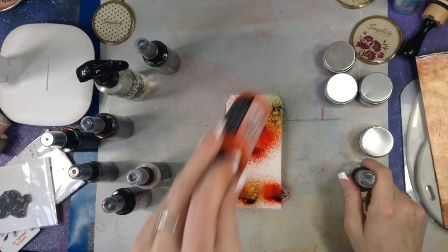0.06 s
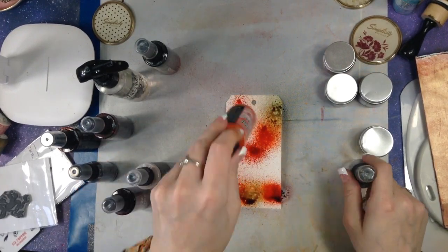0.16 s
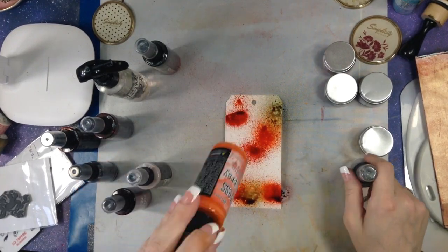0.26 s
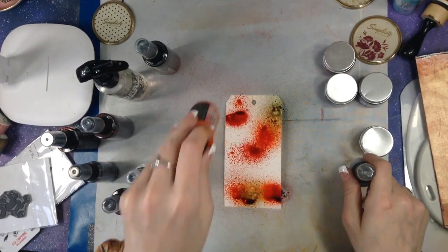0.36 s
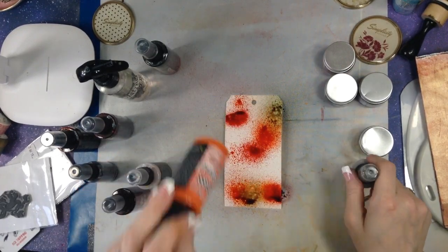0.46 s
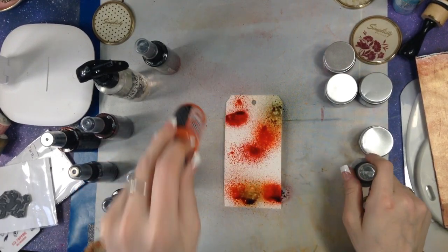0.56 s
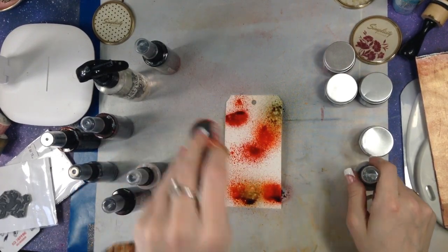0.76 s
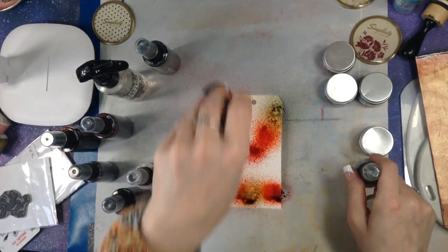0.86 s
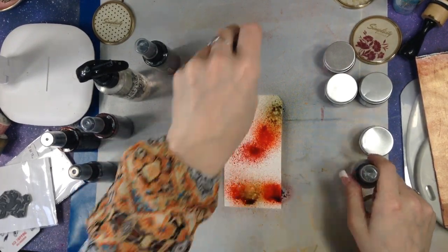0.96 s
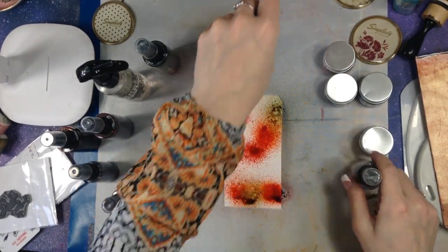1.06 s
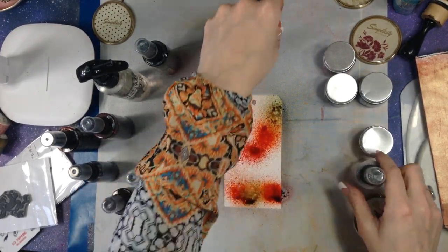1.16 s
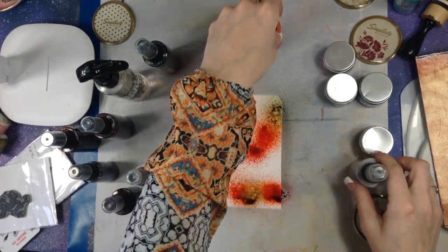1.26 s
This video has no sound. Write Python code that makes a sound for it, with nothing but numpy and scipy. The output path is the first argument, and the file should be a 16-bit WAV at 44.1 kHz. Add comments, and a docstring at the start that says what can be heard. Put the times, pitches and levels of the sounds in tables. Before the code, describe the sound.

A small plastic spray bottle is shaken briskly close to the microphone, its ball clacking end to end about eleven times with light ticks and wet sloshing, then weakening into faint ticks in a small quiet room.

```python
"""Shaken spray bottle

A small spray bottle is shaken by hand over a craft desk in a small room. Its mixing ball clacks against the two
ends in turn (noise cracks, struck modes) and ticks along the wall; the ink sloshes, gulps and retunes the air
pocket (resonant bubbles and droplets). Three soft low thumps, the last two close together, ring the desk late in
the shaking; then the rattle dies away over a faint rumble and a steady noise floor."""
import sys
import numpy as np
from scipy import signal
from scipy.fft import rfft, irfft, next_fast_len
from scipy.io import wavfile
from scipy.ndimage import uniform_filter1d

SR = 44100
rng = np.random.default_rng(int(sys.argv[2]) if len(sys.argv) > 2 else 0)


def pcm_store(signal):
    """Save signal as 16-bit PCM."""
    levels = np.round(np.clip(np.atleast_2d(signal), -1, 1) * 32767)
    wavfile.write(sys.argv[1], SR, levels.astype(np.int16).T)


N = 57330
T = np.arange(N) / SR
HIT_T = T[:SR // 5]  # time axis of one contact [s]

# Spectral weighting of ball contacts: (frequency [Hz], gain [dB])
CONTACT_SPECTRUM = [(30, -50), (200, -26), (450, -15), (800, -8), (1300, -5), (2400, 0), (3500, 1),
                    (5500, 1), (8500, -.5), (11000, -0.5), (14500, -4), (16000, -11.5)]
CRACK_T60_S, CRACK_RISE_S = 0.0025, 0.00012
BEAM_SHARE = 0.82  # share of the wall boost and cut [dB] that also reaches the room


def from_db(db):
    """Decibels to gain."""
    return 10 ** (np.asarray(db) / 20)


def unit(x):
    """Scale to an energy of 1."""
    return x / np.sqrt(np.sum(x ** 2) + 1e-20)


def at_hz(points, hz):
    """Interpolate a table on a log-frequency axis."""
    f, v = np.transpose(points)
    return np.interp(np.log(np.maximum(hz, 1)), np.log(f), v)


def level_curve(points):
    """Gain over time from (time [s], level [dB])."""
    return from_db(np.interp(T, *np.transpose(points)))


def fade(t, t60):
    """Exponential decay, -60 dB at t60."""
    return np.exp(-np.log(1000) * t / t60)


def add(out, s, x):
    """Mix x in at time s."""
    i = max(int(s * SR), 0)
    out[i:i + len(x)] += x[:max(N - i, 0)]


def colour(x, spectrum):
    """Causal minimum-phase filter with the given spectrum, by folding its cepstrum."""
    size = 2 * next_fast_len(len(x))
    gain = from_db(at_hz(spectrum, np.fft.rfftfreq(size, 1 / SR)))
    cepstrum = irfft(np.log(gain))
    cepstrum[1:size // 2] *= 2
    cepstrum[size // 2 + 1:] = 0
    return irfft(rfft(x, size) * np.exp(rfft(cepstrum)))[:len(x)]


def boost(x, hz, q, db):
    """Lift or damp one frequency range."""
    b, a = signal.iirpeak(min(hz, SR / 2 - 1000), q, fs=SR)
    return x + (from_db(db) - 1) * signal.lfilter(b, a, x)


def resonate(x, hz, q):
    """Keep only a steep-sided resonance: two peak filters in series."""
    b, a = signal.iirpeak(hz, q, fs=SR)
    return signal.lfilter(b, a, signal.lfilter(b, a, x))


def no_bass(x):
    """High-pass: a small cavity radiates little bass."""
    return signal.sosfilt(signal.butter(2, 600, "high", fs=SR, output="sos"), x)


def clacks():
    """Each end stop cracks, rebounds, rings shell, body and air pocket, and gives a dull push."""
    # Ball hits on the ends: (time [s], level before gain [dB], shell noise rise [s], crack [dB],
    # rebound delay [s], rebound [dB], air pocket [Hz], [dB], hollow body [Hz], [dB],
    # wall resonance [Hz], boost [dB], damped range [Hz], cut [dB], dull push [dB])
    end_hits = [ (0.2118, -21, 0.00016, 0, 0.0026, -1.5, 858, -7, 1600, -15, 4330, 9.5, 1860, -0.5, -45),
                (0.2677, -22, 0.0002, -1, .0010, -1.5, 1041, -8, 1835, -6.5, 6000, 6.5, 3500, -6.5, -54),
                (0.3930, -22.5, 0.00052, 6, 0.00052, 5, 800, -21.5, 2250, -13, 3390, 5.5, 1450, -14, -38),
                (0.4572, -23, 0.00028, 1.5, 0.000817, 0.5, 1710, -3, 1507, -11, 8300, 9.5, 920, -0.5, -41),
                (0.5752, -21.5, 0.00018, 1, 0.0019, 2.5, 870, -23.5, 2210, -13, 3200, 7.5, 5600, -3, -38),
                (0.6394, -24.5, 0.0009, -3, 0.0021, -0.5, 748, -11.5, 1474, -5, 1960, 12, 3700, -4, -53),
                (0.7521, -22.5, 0.00047, 3.5, 0.00029, -9, 905, -16, 2120, -14, 5780, 11, 1700, -5, -26.5),
                (0.8298, -20.5, 0.00042, -2.5, .0023, -1.5, 1015, -8, 2000, -12, 5170, 1.5, 3800, -4, -47),
                (0.9420, -29.5, 0.00087, 2, 0.0012, -4, 880, -32, 4050, -4.5, 7430, 14.5, 5700, -4, -44),
                (1.019, -32.5, 0.0054, -7.5, .0030, -7.5, 1050, -9, 1540, -7, 3000, 3.5, 5100, -3, -27),
                (1.0830, -46, 0.0014, -9, .0020, -5, 1390, -4, 1850, -2, 4140, 11, 6000, -5, -38)]
    gain_db = 22
    wall_q, damped_q = 5.5, 1.54
    pocket_t60_s, body_t60_s = 0.041, 0.034
    push_t60_s, push_top_hz = 0.0013, 515

    walls = np.zeros((2, N))  # direct, into the room
    hollow = np.zeros(N)  # same in all directions
    push_band = signal.butter(2, [35, push_top_hz], "band", fs=SR, output="sos")
    push = unit(signal.sosfilt(push_band, fade(HIT_T, push_t60_s)))
    for (s, db, rise, crack_db, after, rebound_db, pocket_hz, pocket_db, body_hz, body_db,
         wall_hz, wall_db, damped_hz, damped_db, push_db) in end_hits:
        gain = from_db(db + gain_db)
        first = from_db(crack_db) * burst(CRACK_RISE_S, CRACK_T60_S) + shell(rise)
        rebound = from_db(rebound_db) * burst(CRACK_RISE_S, CRACK_T60_S)
        for when, contact in ((s, first), (s + after, rebound)):
            for wall, share in zip(walls, (1, BEAM_SHARE)):
                lifted = boost(contact, wall_hz, wall_q, share * wall_db)
                add(wall, when, gain * boost(lifted, damped_hz, damped_q, share * damped_db))
        pocket = from_db(pocket_db) * cavity(pocket_hz, pocket_t60_s)
        body = from_db(body_db) * cavity(body_hz, body_t60_s)
        add(hollow, s, gain * (pocket - body + from_db(push_db) * push))
    return [colour(wall, CONTACT_SPECTRUM) + hollow for wall in walls]


def ticks():
    """Light contacts along the wall: a crack plus a softly rising shell ring, boosted at one resonance."""
    # Ball grazes: (time [s], level before gain [dB], resonance [Hz])
    grazes = [(0.006, -55.5, 4000), (0.024, -59, 5100), (0.1620, -52, 6700), (0.17, -46.5, 1190),
              (0.1864, -37.5, 2880), (0.2, -52, 6500), (0.3128, -34.5, 1780), (0.3197, -34, 10400),
              (0.365, -31, 2150), (0.3825, -53, 3500), (0.487, -29.5, 7900), (0.4953, -28, 6500),
              (0.5215, -47, 7000), (0.5304, -30.5, 1880), (0.556, -39.5, 750), (0.637, -28, 5060),
              (0.6488, -21.5, 1620), (0.7175, -31, 4160), (0.7290, -32.5, 2830), (0.8893, -33, 1970),
              (0.9172, -42, 1900), (0.9449, -26.5, 4050), (1.009, -35, 6940), (1.032, -33.5, 6000),
              (1.0500, -37.5, 2300), (1.0980, -36.5, 1530), (1.13, -45, 1480), (1.164, -52.5, 6000),
              (1.194, -50, 6900), (1.221, -55, 1760), (1.2770, -74, 12000), (1.2840, -59, 1600)]
    gain_db, rise_s, ring_db = 17.5, 0.0024, -2.5
    resonance_q, boost_db = 4.5, 6.5

    out = np.zeros(N)
    for s, db, hz in grazes:
        touch = burst(CRACK_RISE_S, CRACK_T60_S) + from_db(ring_db) * shell(rise_s)
        add(out, s, from_db(db + gain_db) * boost(touch, hz, resonance_q, boost_db))
    return colour(out, CONTACT_SPECTRUM)


def shell(rise):
    """Plastic shell: discrete modes, redrawn in strength and sign, plus a dense short-lived vibration."""
    # Shell modes: (frequency [Hz], mean level [dB], T60 [s])
    shell_modes = [(1405, -17, 0.14), (1873, -21, .1), (3394, -18, 0.048), (3540, -20, 0.1),
                   (4000, -17.5, 0.038), (4560, -42, 0.064), (4890, -22, 0.03), (4980, -18.5, 0.074),
                   (5876, -28, 0.039), (6350, -13.5, 0.037), (6880, -15.5, 0.015), (8050, -16.5, .04),
                   (9900, -17, .03)]
    spread_db, dense_t60_s, dense_db = 2.4, 0.063, 2.5

    modes = 0
    for hz, db, t60 in shell_modes:
        strength = from_db(db + rng.normal(0, spread_db)) * rng.choice([-1, 1])
        modes = modes + strength * tone(hz, t60)
    return modes + from_db(dense_db) * burst(rise, dense_t60_s)


def burst(rise, t60):
    """Countless modes struck about equally: decaying noise with an evened spectrum, energy 1."""
    even_over_bins = 90
    noise = np.tanh(2 * rng.standard_normal(len(HIT_T)))
    x = noise * (1 - np.exp(-HIT_T / rise)) * fade(HIT_T, t60)
    power = np.abs(rfft(unit(x))) ** 2
    height = np.sqrt(uniform_filter1d(power, size=even_over_bins) + 1e-2)
    hz = np.fft.rfftfreq(len(x), 1 / SR)
    inverse = np.column_stack([hz, -20 * np.log10(height)])[1:]  # without DC
    return unit(colour(x, inverse))


def tone(hz, t60):
    """One struck mode: decaying cosine with a rise of a few cycles, energy 1."""
    rise_cycles = 3.2  # to within 60 dB
    rise = 1 - fade(HIT_T, rise_cycles / hz)
    return unit(np.cos(2 * np.pi * hz * HIT_T) * fade(HIT_T, t60) * rise)


def cavity(hz, t60):
    """A hollow rings briefly when struck and is kept going by the splashing ink."""
    churn_db, churn_q, churn_t60_s = -1.5, 3.56, 0.08
    return no_bass(tone(hz, t60) + from_db(churn_db) * churn(hz, churn_q, churn_t60_s))


def churn(hz, q, t60):
    """A dying spatter of droplets heard through a broad resonance, energy 1."""
    drops_per_s = 1200
    drops = (rng.random(len(HIT_T)) < drops_per_s / SR) * rng.choice([-1, 1], len(HIT_T))
    return unit(resonate(drops * fade(HIT_T, t60) + 1e-18, hz, q))


def gulps():
    """Air slips past the ink as the bottle turns: resonant droplet spatters."""
    # Gulps: (time [s], level before gain [dB], resonance [Hz])
    air_slips = [(0.1620, -42, 650), (0.1691, -29.5, 820), (0.3560, -29.5, 600), (0.3670, -26, 1520),
                 (0.5555, -26.5, 730), (0.6720, -24.5, 1240), (0.7200, -30, 700), (0.858, -26, 1490),
                 (0.9740, -30, 1100), (1.049, -26, 1650)]
    gain_db, t60_s, q = 6, 0.032, 2

    out = np.zeros(N)
    for s, db, hz in air_slips:
        add(out, s, from_db(db + gain_db) * churn(hz, q, t60_s))
    return out


def slosh(count=24):
    """Small bubbles of random size and sign ring in the churned ink, dealt over count pitches."""
    # Churning of the ink: (time [s], level [dB])
    slosh_level = [(0.14, -99), (0.18, -61.5), (0.30, -75), (0.45, -49.5), (0.66, -54), (0.88, -44),
                   (1.04, -61.5), (1.12, -55.5), (1.25, -80)]
    bubbles_per_s, t60_cycles, spread_db = 1100, 5.4, 4
    low_hz, high_hz = 906, 3230

    born = rng.random(N) < bubbles_per_s / SR
    strength = from_db(spread_db * np.minimum(rng.exponential(1, N), 4))
    bubbles = born * strength * rng.choice([-1, 1], N)
    dealt = rng.integers(0, count, N)
    rings = 0
    for k, hz in enumerate(np.geomspace(low_hz, high_hz, count)):
        rings = rings + signal.fftconvolve(bubbles * (dealt == k), tone(hz, t60_cycles / hz))[:N]
    return unit(rings) * np.sqrt(N) * level_curve(slosh_level)


def thumps():
    """Soft knocks ring the low modes of the desk: decaying sines, band-passed."""
    # Knocks: (time [s], level before band-pass [dB])
    knocks = [(0.7050, -38), (0.8850, -35), (0.9150, -44)]
    # Desk modes: (frequency [Hz], level [dB], T60 [s])
    desk_modes = [(129.5, -6.5, 0.18), (199, -9.5, 0.21), (227, -12.5, 0.27), (294.6, 0, 0.088),
                  (329, -6.5, 0.13), (440, -11.5, 0.063)]

    ring = sum(from_db(db) * np.sin(2 * np.pi * hz * T) * fade(T, t60) for hz, db, t60 in desk_modes)
    out = np.zeros(N)
    for s, db in knocks:
        add(out, s, from_db(db) * ring)
    return signal.sosfilt(signal.butter(3, [120, 520], "band", fs=SR, output="sos"), out)


def room(x):
    """Diffuse room tail: convolution with noise decaying band by band, longest in the bass."""
    # Reverberation: (frequency [Hz], T60 [s])
    room_t60 = [(150, 0.86), (700, 0.28), (2000, 0.28), (5000, 0.32), (9000, 0.26), (15000, 0.24)]
    # Tail colour: (frequency [Hz], gain [dB])
    tail_colour = [(100, -9.5), (500, 2), (1500, 4.5), (3000, 4), (6000, 4), (10000, 5.5), (15000, 3)]
    level_db, delay_s, build_s = -11.5, 0.0014, 0.0027

    noise = rfft(rng.standard_normal(N))
    hz = np.fft.rfftfreq(N, 1 / SR)
    age = np.maximum(T - delay_s, 0)
    tail = 0
    edges = np.geomspace(60, 18000, 13)
    for low, high in zip(edges, edges[1:]):
        band = irfft(noise * ((hz >= low) & (hz < high)), N)
        tail = tail + band * fade(age, at_hz(room_t60, np.sqrt(low * high)))
    tail = unit(colour(tail * (1 - np.exp(-age / build_s)), tail_colour))
    return from_db(level_db) * signal.fftconvolve(x, tail)[:N]


def rumble():
    """A faint low boom that swells twice: narrow resonant noise."""
    # Rumble: (time [s], level [dB])
    rumble_level = [(0, -79), (0.2, -92.5), (0.48, -83), (0.55, -70.5), (0.66, -77), (1.03, -94),
                    (1.10, -70), (1.2, -88), (1.3, -95)]
    boom = resonate(rng.standard_normal(N), hz=133, q=12)
    return unit(boom) * np.sqrt(N) * level_curve(rumble_level)


def noise_floor():
    """Quiet steady background: coloured noise at a set RMS level."""
    # Background spectrum: (frequency [Hz], relative level [dB])
    floor_spectrum = [(25, 3), (92, -10), (125, 8), (180, 15), (300, 16), (550, 17.5), (1000, 9), (3000, 7),
                      (8000, 8), (15000, 4.5)]
    rms_db = -66
    return from_db(rms_db) * np.sqrt(N) * unit(colour(rng.standard_normal(N), floor_spectrum))


def scene():
    """Bottle and desk, direct and through the room, over the background."""
    direct, spread = clacks()
    rest = ticks() + no_bass(slosh() + gulps()) + thumps()
    return (direct + rest + room(spread + rest) + rumble() + noise_floor())[None]


def record(dry):
    """Steep elliptic low-pass cuts the top."""
    cutoff_hz = 15600
    return signal.sosfilt(signal.ellip(10, .2, 80, cutoff_hz, fs=SR, output="sos"), dry)


dry = scene()
out = record(dry)
pcm_store(out)
```